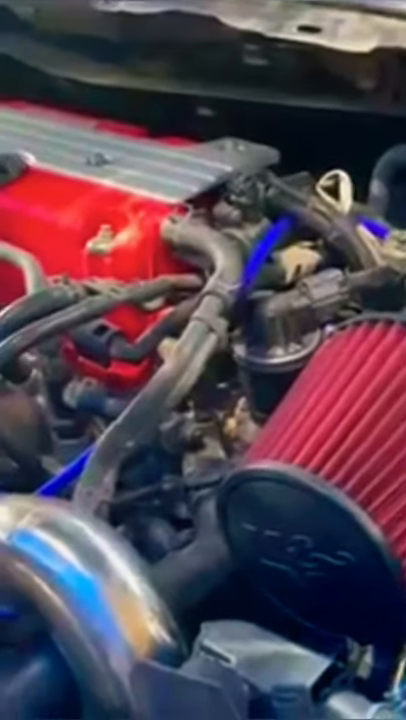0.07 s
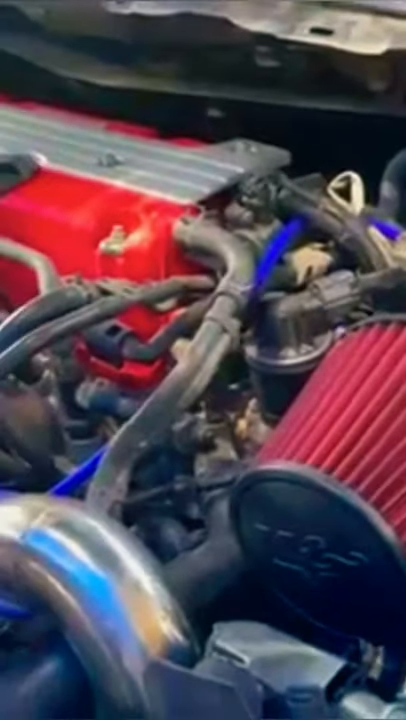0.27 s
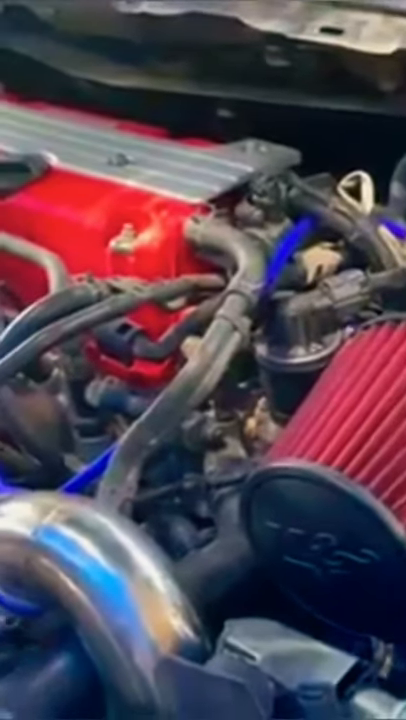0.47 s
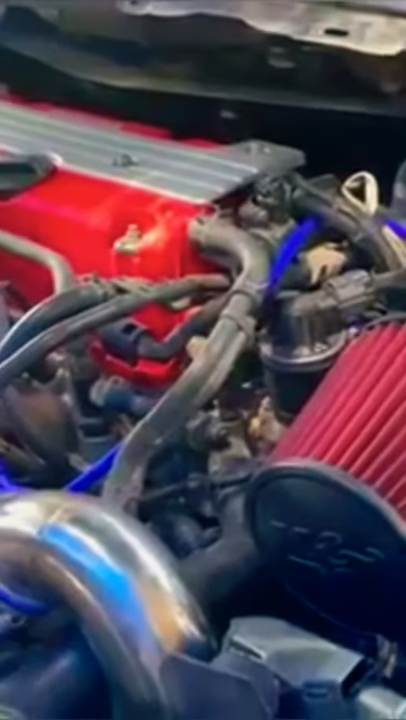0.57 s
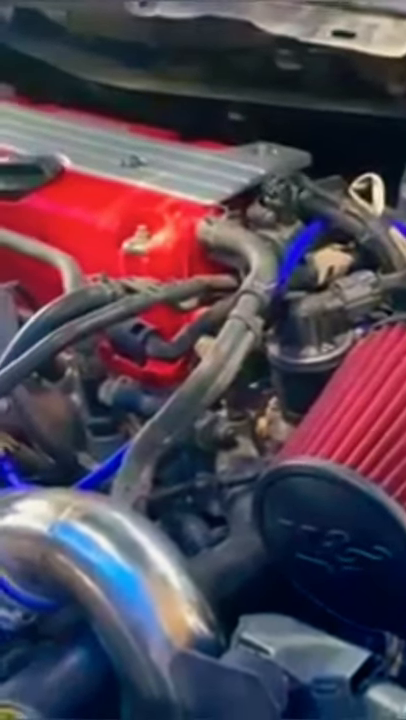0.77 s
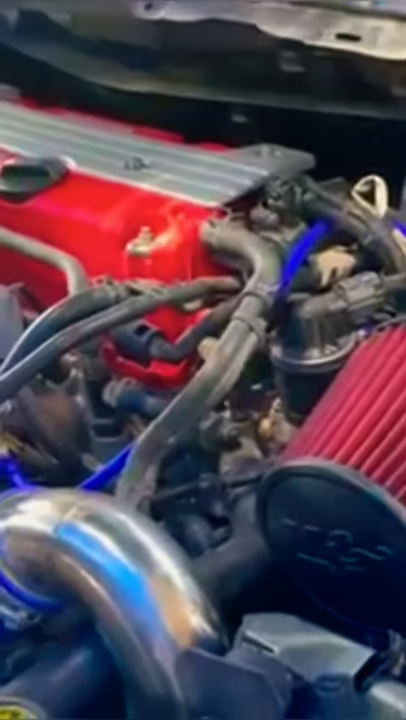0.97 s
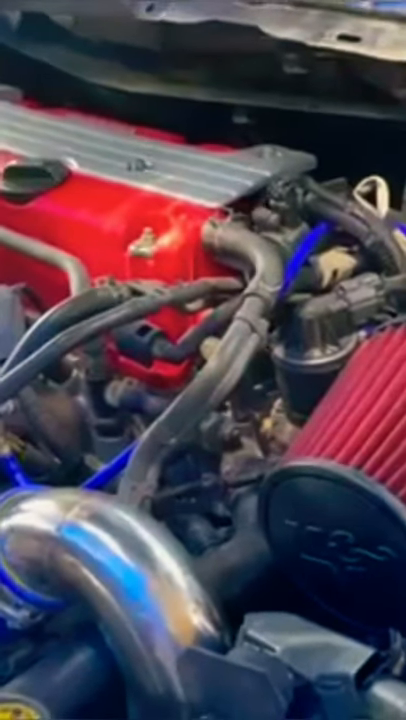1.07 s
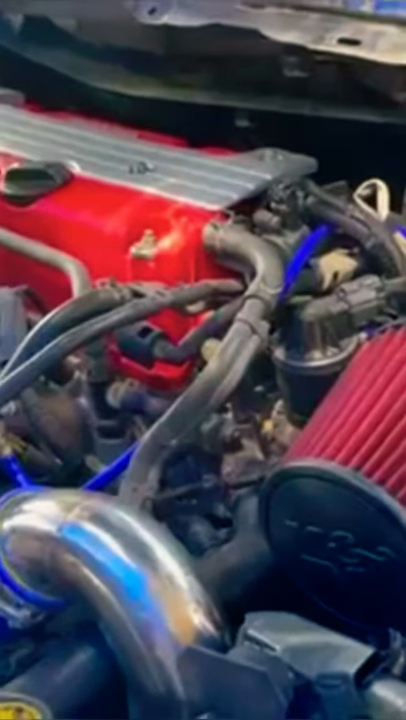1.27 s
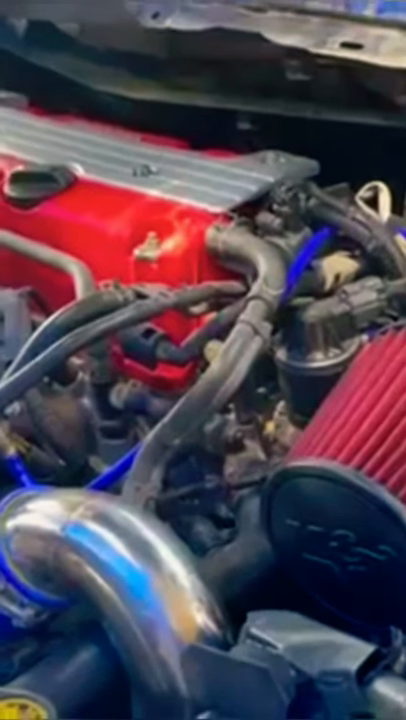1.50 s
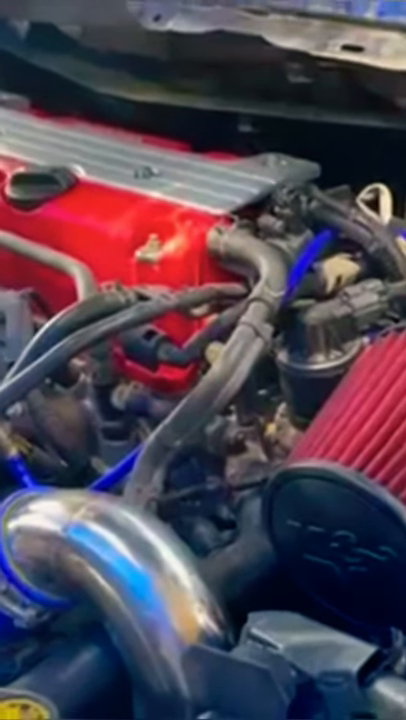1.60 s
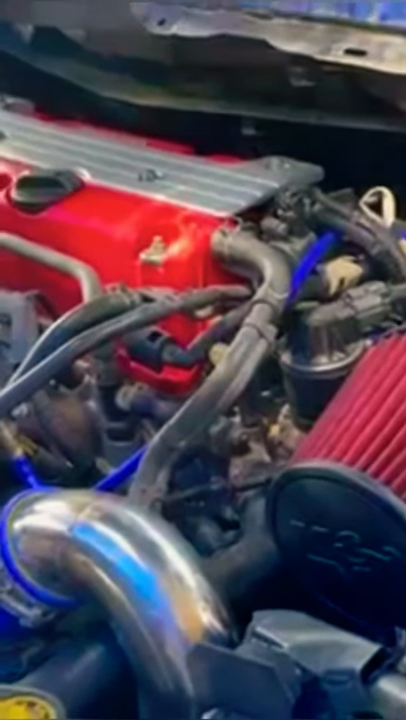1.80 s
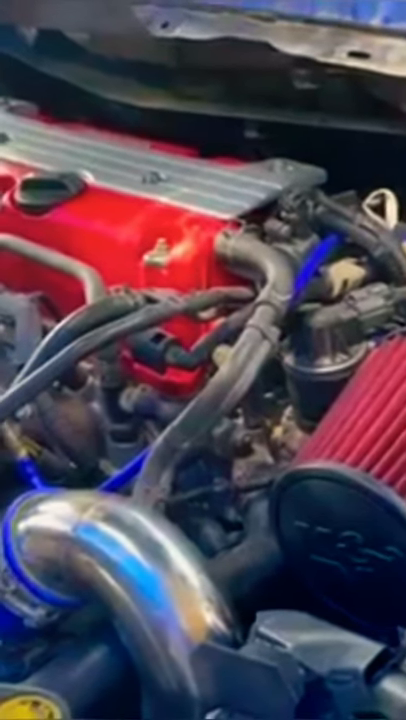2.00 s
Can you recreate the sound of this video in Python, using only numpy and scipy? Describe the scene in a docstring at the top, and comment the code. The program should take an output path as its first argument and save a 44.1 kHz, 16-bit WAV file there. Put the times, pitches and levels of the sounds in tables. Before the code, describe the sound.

One rev of a car engine with rising turbo whistle, then a hissing pressure release.

```python
"""Just above an open engine bay, a turbocharged four-cylinder is blipped once. Its firing pulses form
a harmonic series that climbs through the intake resonances as a growl, while turbulent air and the
compressor blades add a swelling rush and whistle. The throttle snaps shut, the blow-off valve honks,
thumps and hisses out the boost, and the engine coasts down with a smooth hum and valve clatter."""
import sys
import numpy as np
from scipy import signal
from scipy.fft import rfft, irfft, next_fast_len
from scipy.io import wavfile

SR = 44100
rng = np.random.default_rng(int(sys.argv[2]) if len(sys.argv) > 2 else 0)


def transcribe(signal):
    """Save signal, clipped to [-1, 1], as a 16-bit WAV file at the path in sys.argv[1]."""
    frames = np.atleast_2d(signal).T
    limited = np.clip(frames, -1, 1)
    pcm = np.round(limited * 32767).astype(np.int16)
    wavfile.write(sys.argv[1], SR, pcm)


N = 90404
T = np.arange(N) / SR
BIN_HZ = np.fft.rfftfreq(N, 1 / SR)
TOP_HZ = 11780  # upper edge of the sound


def undb(db):
    """Amplitude grows tenfold for every 20 dB."""
    return 10 ** (np.asarray(db) / 20)


def curve(table, column=1):
    """Linear interpolation gives a column of a time table at every sample."""
    rows = np.array(table, float)
    return np.interp(T, rows[:, 0], rows[:, column])


def colour_at(table, hz):
    """A frequency response: gain at hz, interpolated in dB over log frequency."""
    rows = np.array(table, float)
    return undb(np.interp(np.log(np.maximum(hz, 1)), np.log(rows[:, 0]), rows[:, 1]))


def tint(x, table):
    """Filtering multiplies the spectrum by a frequency response."""
    return irfft(rfft(x) * colour_at(table, BIN_HZ), N)


def unit(x):
    """Normalisation to an rms of 1."""
    return x / np.sqrt(np.mean(x ** 2))


def walk(hz):
    """Low-passed noise of rms 1 fluctuates about hz times a second."""
    size = next_fast_len(N, True)
    low_pass = np.exp(-(np.fft.rfftfreq(size, 1 / SR) / hz) ** 2)
    return unit(irfft(rfft(rng.standard_normal(size)) * low_pass, size)[:N])


def swell(peak_s, rise_s, fall_s, hold_s=0):
    """The envelope of a transient: Gaussian flanks around an optional hold."""
    rising = np.minimum(T - peak_s, 0) / rise_s
    falling = np.maximum(T - peak_s - hold_s, 0) / fall_s
    return np.exp(-.5 * rising ** 2 - .5 * falling ** 2)


def ears(mid, side):
    """Scatter in the bay decorrelates the ears: it adds to the left and subtracts from the right."""
    # Each row: frequency in Hz, gain of the scattered side signal in dB.
    width = [(150, -90), (260, -30), (400, -8), (600, -1), (1100, -8.5), (2000, -20), (3200, -0.5),
             (5000, 1), (6300, -20), (8500, 4.5), (11000, -4.5)]
    return mid + tint(side, width) * np.array([[1], [-1]])


def air(colour, gate=1):
    """Turbulence is broadband noise: here gated, coloured, normalised and spread in stereo."""
    mid, side = (unit(tint(gate * rng.standard_normal(N), colour)) for _ in range(2))
    return ears(mid, side)


def flutter(depth_db=1.42, rate_hz=35):
    """Unsteady flow modulates the amplitude of its noise."""
    return undb(depth_db * walk(rate_hz))


def band_flicker(x, bands=9, depth_db=1.8, rate_hz=13):
    """Random amplitude modulation: each frequency band of the hiss flickers in level independently."""
    place = BIN_HZ / TOP_HZ * (bands - 1)
    spectrum = rfft(x)
    parts = (irfft(spectrum * np.maximum(1 - abs(place - k), 0), N) for k in range(bands))
    return sum(part * undb(depth_db * walk(rate_hz)) for part in parts)


def engine_bay(x, centred_below_hz=190):
    """Cavity resonance colours the sound; the midrange leans right and the bass stays centred."""
    # Peaks and dips of the bay and its pipes. Each row: centre in Hz, width in Hz, gain in dB.
    resonances = [(380, 17, 2), (745, 68, 4), (871, 58, 3.5), (1084, 21, -2), (1262, 13, -4.5),
                  (1342, 36, 3), (1630, 57, 1), (2180, 26, 8), (3210, 84, -7), (3087, 52, 8),
                  (3717, 29, 10.5), (4080, 140, 5), (10770, 135, 9)]
    # Each row: frequency in Hz, left level over right in dB.
    balance = [(350, 2.5), (600, -4), (1160, -2.5), (2090, 0.4), (6000, -0.5)]
    lift_db = sum(db / (1 + (2 * (BIN_HZ - hz) / width) ** 2) for hz, width, db in resonances)
    off_centre = np.clip(BIN_HZ / centred_below_hz - 1, 0, 1)
    lean = colour_at(balance, BIN_HZ) ** (off_centre / 2)
    return irfft(rfft(x) * undb(lift_db) * np.array([lean, 1 / lean]), N)


def buffet():
    """Air moving through the bay rumbles with low-frequency turbulence."""
    # Each row: time in seconds, level in dB.
    level = [(0, -36), (.15, -36.5), (.29, -23.5), (.38, -42), (.8, -33.5), (.97, -34), (1.02, -31.5),
             (1.12, -40), (1.5, -50), (2.05, -42.5)]
    # Each row: frequency in Hz, relative level in dB.
    colour = [(20, -29), (45, -7), (90, -2.5), (200, -8.5), (500, -35), (2000, -70)]
    return air(colour) * undb(curve(level))


def clatter(firings, tick_db=-4, scatter_db=1.5, count=1024):
    """Valve impacts, two per firing and uneven in strength, add in power to the whirr of belts."""
    # Each row: time in seconds, level in dB.
    level = [(0, -40.5), (.06, -39.5), (.12, -46), (.22, -34.5), (.28, -40.5), (.5, -29.5), (.9, -33.5),
             (1.3, -36), (1.58, -32.5), (1.75, -35.5), (1.9, -38.5), (2.05, -39.5)]
    # Each row: frequency in Hz, relative level in dB.
    colour = [(60, -24), (250, 3), (400, 0.5), (520, -3), (750, 1), (1150, 4.5), (1750, -1), (2200, 0.5),
              (2900, -2), (4000, -3.5), (4800, -13), (5500, -1.5), (8000, -11), (10000, -10), (11000, -7.5),
              (12000, -6.5)]
    beats = 2 * firings
    strength = undb(scatter_db * rng.standard_normal(count))[beats.astype(int) % count]
    ticks = unit(strength * np.exp(-(beats % 1) / .25))  # decay time: a quarter of the gap
    return air(colour, np.hypot(1, undb(tick_db) * ticks)) * undb(curve(level))


def whine(firings, wander_db=3, phase_jitter=.55):
    """Belt-driven parts turn at fixed ratios to the crank, so their wavering partials track the revs."""
    # Each row: multiple of the firing rate, relative level in dB.
    partials = [(5, -7), (6.7, -7), (8.35, -1), (10.4, -1.5), (12.1, 0), (13.3, -6), (16.6, -2.5)]
    # Each row: time in seconds, level in dB.
    level = [(0, -71), (.3, -50), (.5, -47), (.6, -39.5), (.67, -34), (.74, -38), (.86, -29.5), (.95, -62),
             (2.05, -53)]
    mid, side = 0, 0
    for order, db in partials:
        gain = undb(db + wander_db * walk(13))
        angle = 2 * np.pi * (order * firings + rng.random()) + phase_jitter * walk(60)
        mid, side = mid + gain * np.sin(angle), side + gain * np.cos(angle)
    return ears(mid, side) * undb(curve(level))


def boom(firings, roughness=.05):
    """Periodic firing radiates a nearly pure fundamental and second harmonic."""
    # Each row of both: time in seconds, level in dB.
    fundamental = [(0, -29.5), (.09, -33), (.2, -45), (.33, -35), (.4, -20.5), (.48, -26.5), (.58, -19),
                   (.62, -16), (.7, -12.5), (.745, -30.5), (.83, -22.5), (.87, -18.5), (.9, -43),
                   (1.08, -34), (1.2, -34), (1.34, -27.5), (1.4, -21.5), (1.445, -21), (1.49, -27),
                   (1.58, -20), (1.66, -24.5), (1.81, -27), (1.9, -33), (1.96, -30), (2.05, -28.5)]
    octave = [(0, -39), (0.149, -37), (.21, -33), (.26, -24), (.3, -15), (.4, -15), (.48, -22), (.6, -26),
              (.7, -37), (.745, -26), (.87, -23.5), (.9, -53), (1, -48.5), (1.33, -54.5), (1.44, -43),
              (1.49, -48), (1.57, -39.5), (1.68, -40), (1.82, -47.5), (1.95, -39), (2.05, -46)]
    hum = 0
    for order, level in enumerate((fundamental, octave), start=1):
        amplitude = np.sqrt(2) * undb(curve(level)) * (1 + roughness * walk(45))
        hum = hum + amplitude * np.sin(2 * np.pi * order * firings)
    return hum


def growl(firings, hz, half_order_db=-15.5, roughness=.23, wander_db=2, gasp_db=-7.5):
    """Harmonics, and half orders from unequal cylinders, sweep through the intake's fixed resonances."""
    # Response of the intake tract. Each row: frequency in Hz, gain in dB.
    tract = [(30, -22), (70, -9.5), (130, 3), (190, -2.5), (250, -3.5), (310, -5.5), (360, 0), (400, -1),
             (430, -11.5), (550, -20), (780, -13.5), (1200, -27), (2000, -39)]
    # The strength follows the throttle. Each row: time in seconds, level in dB.
    level = [(0, -41), (.06, -34), (.13, -45), (.19, -40), (.23, -29), (.3, -21.5), (.45, -17), (.6, -18.5),
             (.72, -16.5), (.87, -18.5), (.89, -30), (1.02, -43), (1.12, -41), (1.4, -66), (1.7, -34.5),
             (1.85, -45), (2.05, -54)]
    throttle_shut = np.clip((T - .876) / .024, 0, 1)
    db_per_octave = -5 - 6 * throttle_shut
    mid, side = 0, 0
    for halves in range(3, 21):
        order = halves / 2
        if order == 2:  # the boom carries this harmonic
            continue
        source_db = half_order_db * (halves % 2) + db_per_octave * np.log2(order / 2)
        gain = undb(source_db) * colour_at(tract, order * hz)
        gain = gain * (1 + roughness * walk(34)) * undb(wander_db * walk(8.9))
        angle = 2 * np.pi * (order * firings + rng.random()) + roughness * walk(28)
        mid, side = mid + gain * np.sin(angle), side + gain * np.cos(angle)
    gasps = undb(gasp_db) * air(tract, gate=np.exp(-(firings % 1) / .54))
    return (ears(mid, side) + gasps) * undb(curve(level))


def throttle_hiss():
    """A brief turbulent jet passes the throttle plate as it cracks open."""
    # Each row: frequency in Hz, relative level in dB.
    colour = [(1500, -18), (3500, -8), (6000, -21), (12000, -19)]
    return air(colour) * undb(-43) * swell(peak_s=.222, rise_s=.022, fall_s=.025)


def suction(firings, pulse_depth=.45):
    """Air is gulped through the filter, so its flow noise is modulated at the firing rate."""
    # Each row: time in seconds, level in dB.
    level = [(0, -47), (.2, -41), (.3, -38), (.45, -37.5), (.6, -29), (.75, -23.5), (.82, -21),
             (.87, -20.5), (.9, -28.5), (.95, -37.5), (1.02, -33.5), (1.12, -51), (2.05, -81)]
    # Each row: frequency in Hz, relative level in dB.
    colour = [(200, -25), (400, -0.5), (550, -9.5), (760, -2.5), (950, -3), (1250, -1), (1550, -8.5),
              (2150, -11), (2800, -10), (3300, -14.5), (4700, -18), (8000, -18.5), (12000, -16)]
    gulps = 1 + pulse_depth * np.cos(2 * np.pi * firings)
    return air(colour, gulps) * undb(curve(level)) * flutter()


def whistle(hz, width_hz):
    """Random modulation broadens a gliding tone into a breathy band."""
    angle = 2 * np.pi * np.cumsum(hz) / SR
    mid, side = (walk(width_hz) * np.sin(angle) + walk(width_hz) * np.cos(angle) for _ in range(2))
    return ears(mid, side)


def turbo(surge_db=1.8, surge_hz=22):
    """The compressor radiates a turbulent rush and blade-passing tones that rise as it spools up."""
    # Each row: time in seconds, level in dB.
    rush_level = [(0, -48.5), (.3, -53), (.45, -41), (.55, -33.5), (.65, -28.5), (.74, -23.5), (.87, -22),
                  (.92, -25.5), (.97, -67), (2.05, -80)]
    # Each row: frequency in Hz, relative level in dB.
    rush_colour = [(1000, -31), (2500, -5), (3800, 0.5), (4700, -4.5), (5700, 7.5), (7000, 4.5),
                   (7800, -1.5), (9200, 6), (10000, -18), (10900, 5), (12000, -1)]
    # Each row: time in seconds, blade-passing frequency in Hz, its level in dB,
    # level in dB of the octave below, from the long blades alone.
    spool = [(.3, 6000, -64, -75), (.44, 7700, -56, -70), (.51, 9600, -49, -60), (.55, 11200, -33, -52),
             (.6, 13500, -48, -45), (.69, 17200, -60, -33), (.75, 18600, -60, -31), (.87, 19600, -60, -41),
             (.93, 19000, -70, -70)]
    rush = air(rush_colour) * undb(curve(rush_level) + surge_db * walk(surge_hz))
    hz = curve(spool)
    blades = whistle(hz, width_hz=500) * undb(curve(spool, column=2))
    long_blades = whistle(hz / 2, width_hz=1200) * undb(curve(spool, column=3))
    return rush + blades + long_blades


def honk(peak_s, rise_s=.006, sag_s=.032, sag_per_s=3.9, roughness=.42, rough_hz=260):
    """The opening valve oscillates briefly in rough partials that sag in pitch together."""
    # Each row: frequency midway through the sag in Hz, level in dB.
    partials = [(1098, -15.3), (1240, -28), (2185, -26.5)]
    pitch_ratio = 1 - sag_per_s * (np.clip(T - peak_s + rise_s, 0, sag_s) - sag_s / 2)
    cycles_per_hz = np.cumsum(pitch_ratio) / SR
    tone = 0
    for hz, db in partials:
        angle = 2 * np.pi * hz * cycles_per_hz + roughness * walk(rough_hz)
        amplitude = np.sqrt(2) * undb(db) * (1 + roughness / 2 * walk(rough_hz))
        tone = tone + amplitude * ears(np.sin(angle), np.cos(angle))
    return tone * swell(peak_s, rise_s, fall_s=.018, hold_s=.013)


def blow_off(honk_s=.907):
    """Boost pressure escapes as a jet: the valve hisses, honks with a rasp, thumps and bleeds off."""
    # Puffs of escaping air. Each row: start in seconds, attack in seconds,
    # fade in dB per second, level in dB.
    puffs = [(0.876, 0.015, 143, -17.5), (0.936, 0.11, 23, -24)]
    # Each row of all three: frequency in Hz, relative level in dB.
    hiss_colour = [(300, -56), (800, -3.5), (2000, -3), (3800, -1.5), (4800, -5), (5500, 4), (6400, 0.5),
                   (8200, -1), (10000, -0.5), (10700, 0), (11300, 9), (12000, -1.5)]
    thump_colour = [(25, -27), (60, 6.5), (130, 6.5), (220, 3), (380, -2.5), (600, -10.5), (1200, -37),
                    (3000, -61)]
    rasp_colour = [(400, -33), (800, -7), (1200, -18), (1500, 7), (2100, 0), (2700, -11), (6000, -17)]
    flow = 0
    for start, attack, fade, db in puffs:
        opening = np.clip((T - start) / attack, 0, 1)
        flow = flow + opening * undb(db - fade * np.maximum(T - start - attack, 0))
    hiss = air(hiss_colour) * flow * flutter()
    tone = honk(honk_s)
    thump = air(thump_colour) * undb(-14) * swell(peak_s=.924, rise_s=.01, fall_s=.015)
    rasp = air(rasp_colour) * undb(-23) * swell(honk_s, rise_s=.012, fall_s=.015)
    return hiss + rasp + tone + thump


def scene():
    """The sources superpose, and one crankshaft sets the phase of every engine layer."""
    # Each row: time in seconds, firings per second.
    speed = [(0, 47.3), (.2, 51.8), (.278, 58.8), (.304, 62.3), (.402, 78.9), (.478, 94.6), (.6, 121),
             (.694, 135.8), (.828, 162.6), (.885, 179), (.99, 169), (1.084, 159), (1.296, 134),
             (1.444, 126), (1.566, 114), (1.81, 94.6), (1.95, 85), (2.05, 79)]
    hz = curve(speed) * (1 + .0021 * walk(31))  # slight speed jitter
    firings = np.cumsum(hz) / SR
    engine = boom(firings) + growl(firings, hz) + whine(firings) + clatter(firings)
    airflow = throttle_hiss() + suction(firings) + turbo() + blow_off()
    return engine_bay(engine + band_flicker(airflow)) + buffet()


def record(dry):
    """Soft saturation rounds the highest peaks, and a steep low-pass filter cuts the top."""
    rounded = dry / (1 + dry ** 6) ** (1 / 6)
    return signal.sosfilt(signal.ellip(12, .2, 90, TOP_HZ, fs=SR, output="sos"), rounded)


dry = scene()
out = record(dry)
transcribe(out)
```